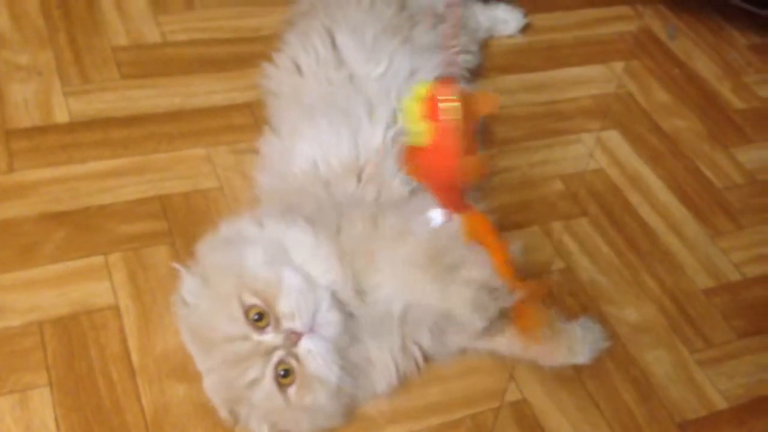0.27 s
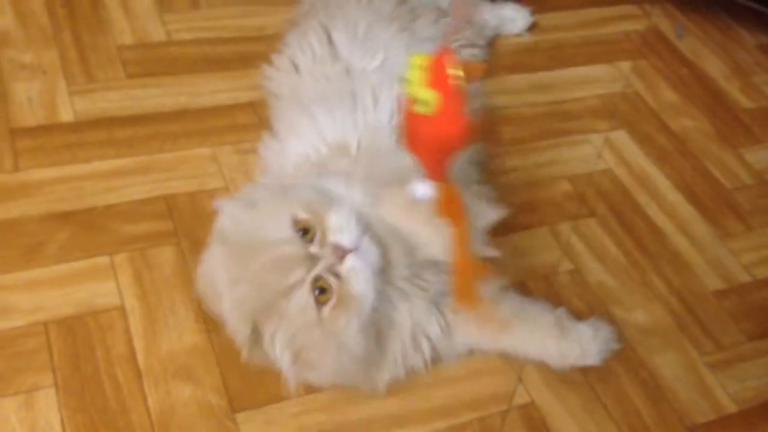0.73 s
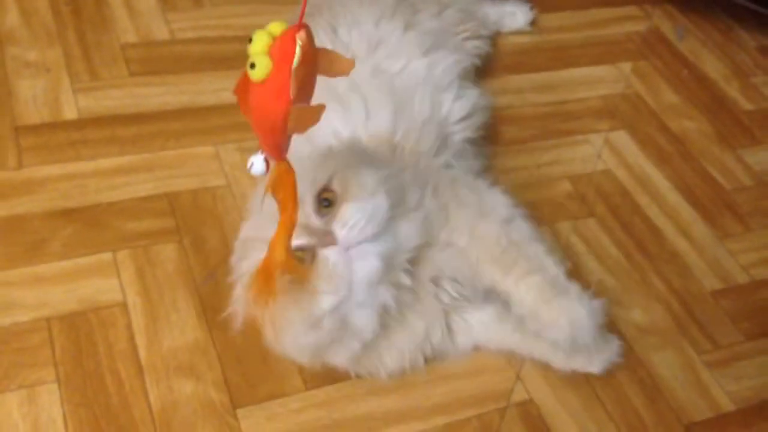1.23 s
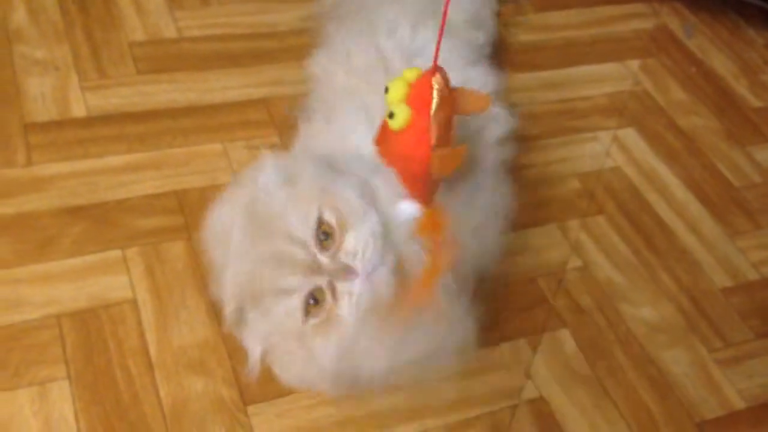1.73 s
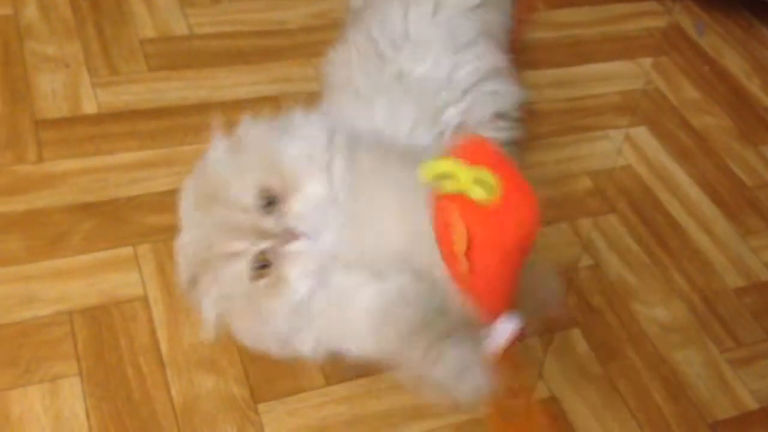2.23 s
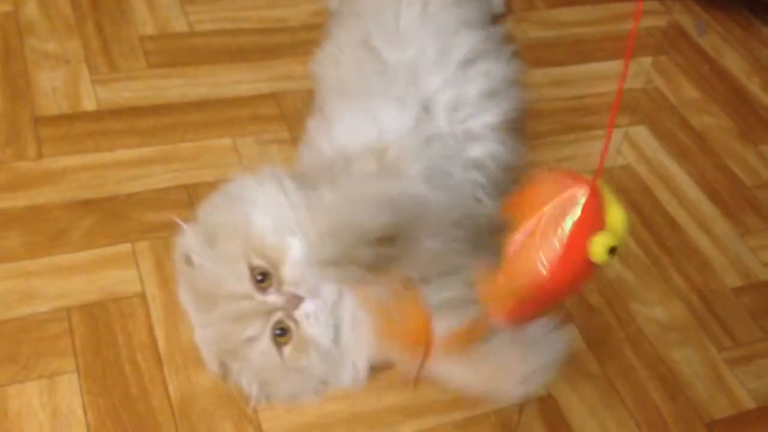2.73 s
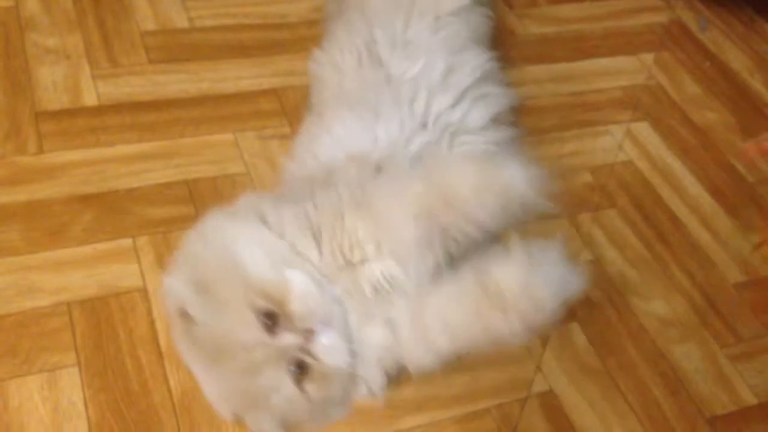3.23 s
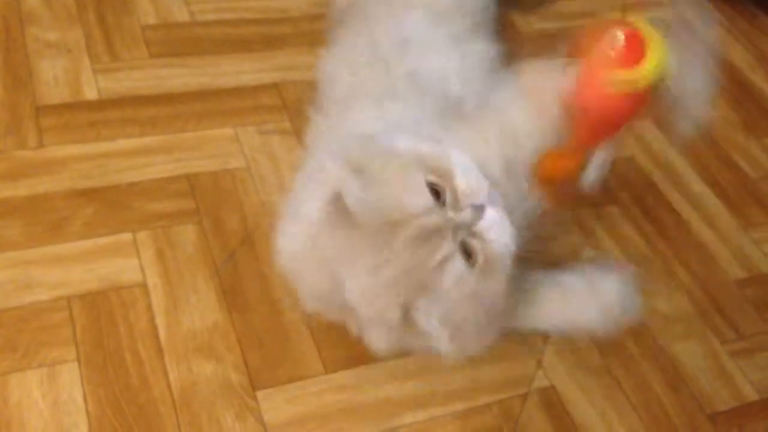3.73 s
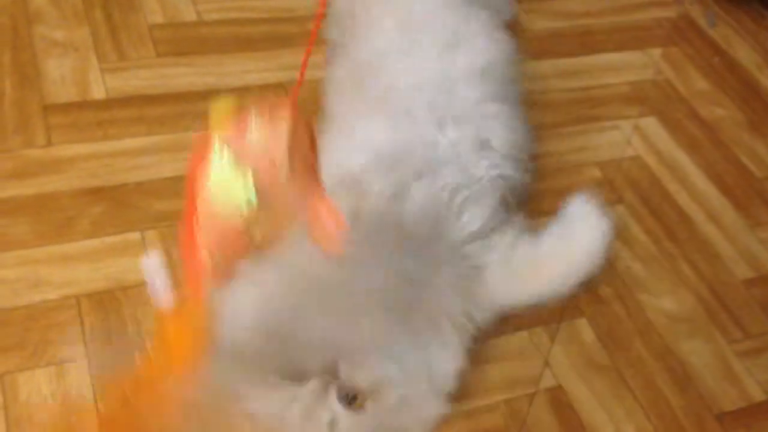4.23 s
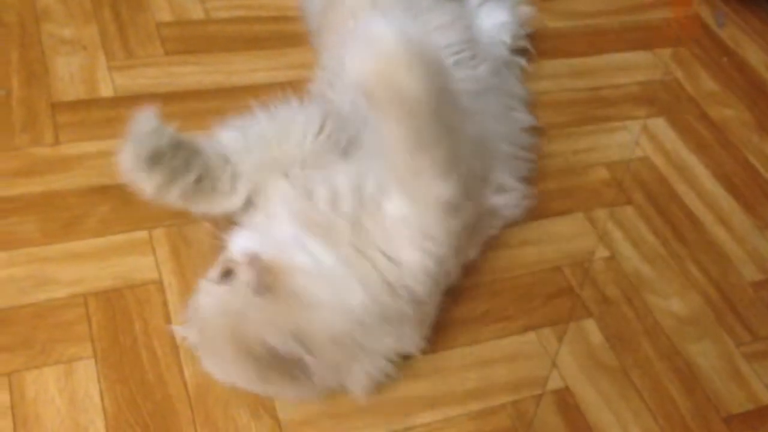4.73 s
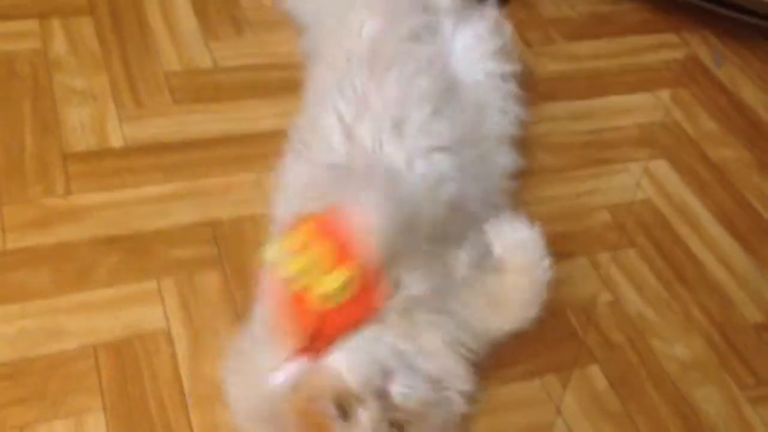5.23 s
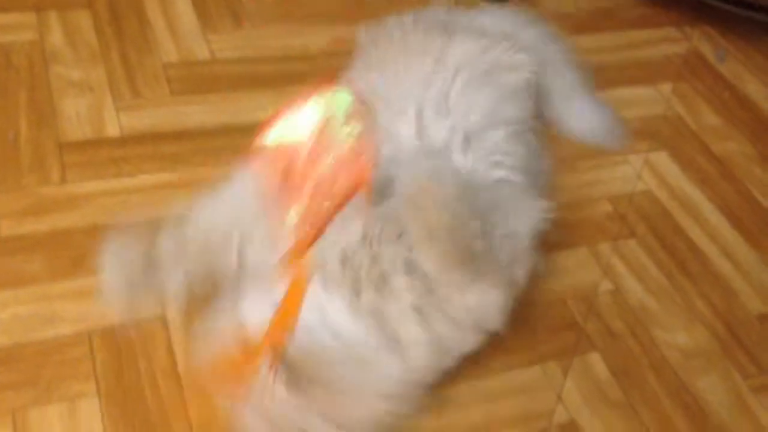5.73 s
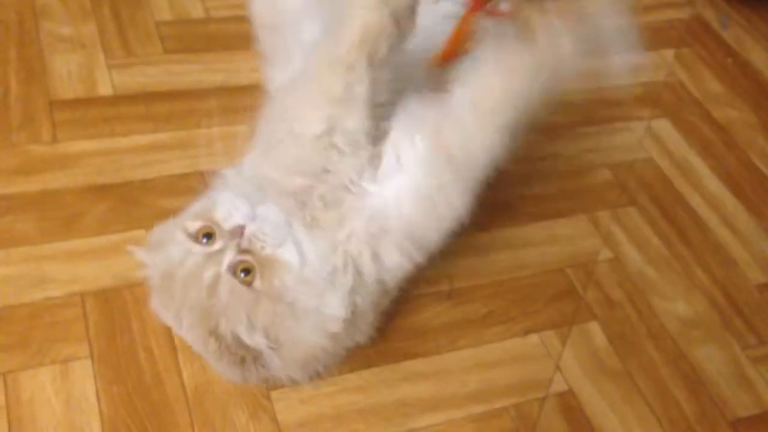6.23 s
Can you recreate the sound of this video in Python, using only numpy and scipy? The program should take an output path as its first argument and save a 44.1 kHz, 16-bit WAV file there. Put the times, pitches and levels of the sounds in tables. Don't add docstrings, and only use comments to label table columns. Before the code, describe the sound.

A tiny bell inside a dangling toy tinkles in short irregular bursts as a kitten bats it, with claw clicks and soft thumps on wood.

```python
import sys
import numpy as np
from scipy import signal
from scipy.fft import rfft, irfft
from scipy.io import wavfile

SR = 44100
rng = np.random.default_rng(int(sys.argv[2]) if len(sys.argv) > 2 else 0)


def log_audio(samples):
    frames = np.atleast_2d(samples).T
    limited = np.clip(frames, -1, 1)
    pcm = np.round(limited * 32767).astype(np.int16)
    wavfile.write(sys.argv[1], SR, pcm)


def gain_from_decibels(decibels):
    exponent = np.asarray(decibels, float) / 20
    return 10 ** exponent


N = 285327

# start_s, length_s, chatter_db, swish_rms_db
TOY_SHAKES = [(1.905, .07, -54, -62), (2.074, .02, -62, -56), (2.092, .2, -54, -63),
              (2.59, .037, -58, -60.5), (2.65, .032, -49, -60), (3.157, .055, -50, -58),
              (3.198, .08, -47, -54), (3.795, .083, -53, -58.5), (4.424, .13, -51, -60),
              (5.27, .042, -56, -66), (6.406, .055, -56, -63)]


def evened(x):
    return x / np.sqrt(np.mean(x ** 2) + 1e-20)


def add(mix, start_s, sound):
    part = mix[max(round(start_s * SR), 0):][:len(sound)]
    part += sound[:len(part)]


def coloured(x, points):
    f, db = np.transpose(points)
    hz = np.fft.rfftfreq(len(x), 1 / SR)
    response_db = np.interp(np.log(hz + 1), np.log(f + 1), db)
    return irfft(rfft(x) * gain_from_decibels(response_db), len(x))


def banded(x, hz, width_hz, order=2):
    low = max(hz - width_hz / 2, hz / 4)
    high = min(hz + width_hz / 2, SR / 2 - 100)
    return signal.sosfilt(signal.butter(order, [low, high], "bandpass", fs=SR, output="sos"), x)


def ringing(modes, t, phases, pitch=1, damping=1):
    return sum(gain_from_decibels(db - 60 * damping * t / t60) * np.sin(2 * np.pi * (hz * pitch * t + phase))
               for (hz, db, t60), phase in zip(modes, phases))


def floor():
    # freq_hz, level_db_per_hz
    hum_spectrum = [(15, -31), (30, -12), (52, 3.5), (62, -1.5), (100, -0.5), (185, -1.5), (240, -9),
                    (290, -7), (400, -14.5), (520, -11), (800, -17.5), (1200, -29.5), (2000, -54)]
    hiss_spectrum = [(410, -23), (700, -10.5), (917, -14.5), (1060, -9.5), (1770, -12.5), (2290, -11),
                     (15200, -14)]
    knots = np.arange(0, N + 500, 500)
    lumps = np.interp(np.arange(N), knots, rng.standard_normal(len(knots)))
    hum = evened(coloured(rng.standard_normal(N), hum_spectrum))
    hum += banded(hum, 312, 445) * (gain_from_decibels(3.9 * np.clip(lumps, -2, 1.8)) - 1)
    drone = evened(banded(rng.standard_normal(N), 519.3, 62))
    hiss = evened(coloured(rng.standard_normal(N), list(hiss_spectrum) + [(15450, -26)]))
    return gain_from_decibels(-66.5) * hum + gain_from_decibels(-78) * drone + gain_from_decibels(-68) * hiss


def room(x):
    # freq_hz, t60_s
    decay_times = [(200, 0.32), (2000, 0.12), (6000, 0.17), (14000, 0.11)]
    taps = np.zeros(SR // 2)
    at = np.arange(130, len(taps) - 20, 20)
    taps[at + rng.integers(0, 20, len(at))] = rng.choice([-1., 1.], len(at))
    hz, t, z = signal.stft(taps, SR, nperseg=128)
    f, t60 = np.transpose(decay_times)
    decay = gain_from_decibels(-60 * t / np.interp(hz, f, t60)[:, None])
    tail = signal.istft(z * decay, SR, nperseg=128)[1]
    return signal.fftconvolve(x, tail / np.linalg.norm(tail))[:N]


def thumps():
    # start_s, blow_db, pitch_factor, damping_factor
    blows = [
        (3.9328, -21.5, 1, 1.27),
        (3.978, -38, 1.04, 1.7),
        (4.08, -45.5, 1, 1.05),
        (4.269, -42.5, 0.9, 1.25),
        (4.31, -51, 0.406, 0.85),
        (6.24, -48.5, 0.48, 1.2),
        (.56, -54.5, 1.5, 1.3),
        (.47, -57, 1.61, 0.57),
    ]
    # freq_hz, level_db, t60_s
    board_modes = [(184, 5.5, 0.22), (214, -14, 0.07), (158, -17, 0.073), (272, -27, 0.068),
                   (430, -8, 0.047), (730, -46, .03)]
    out, t = np.zeros(N), np.arange(9000) / SR
    for start, db, pitch, damping in blows:
        ring = ringing(board_modes, t, np.zeros(len(board_modes)), pitch, damping)
        ring *= 1 - np.exp(-(t / 0.002) ** 2)
        ring *= .06 + .94 / (1 + (damping * t / .038) ** 8)
        ring = banded(ring, 440 * pitch, 600 * pitch, order=3)
        add(out, start, gain_from_decibels(db) * ring / abs(ring).max())
    return out


def rustles():
    strokes = list([(0, .068, -65.5, 3000, 5000), (0, .035, -70, 10000, 900), (.434, .23, -64.5, 520, 500),
                    (.46, .16, -73, 1500, 1000), (.61, .21, -71, 13100, 5000), (.866, .16, -66, 3870, 3520),
                    (.86, .19, -72, 9900, 700), (.856, .17, -75, 8850, 8000), (1.45, .047, -61, 3000, 4500),
                    (3.999, .03, -57, 2600, 2400), (1.735, .09, -70, 11500, 2500),
                    (4.805, .09, -72, 750, 120), (3.93, .12, -69, 9000, 11000),
                    (4.043, .06, -69, 3000, 4500), (4.212, .034, -59, 5500, 7500),
                    (4.105, .035, -61, 3500, 5500), (4.88, .11, -65.5, 7000, 7500),
                    (3.98, .15, -71, 1050, 400), (5.542, .46, -72.5, 6300, 7900),
                    (5.873, .05, -69, 2000, 500), (5.995, .18, -64, 11800, 6600),
                    (5.99, .37, -70.5, 3500, 4070), (6.274, .076, -66, 1000, 1800),
                    (2.073, .025, -47, 3000, 4500)])
    swish_hz, swish_width_hz = 6800, 6500
    grain_full_db, long_s = 3.5, .1
    strokes += [(start, length, db, swish_hz, swish_width_hz) for start, length, _, db in TOY_SHAKES]
    out = np.zeros(N)
    noise = rng.standard_normal(N)
    size = np.repeat(np.minimum(rng.exponential(1, N // 60 + 1), 3), 60)[:N]
    lumps = rng.standard_normal((len(strokes), 24))
    for (start, length, db, hz, width_hz), lump in zip(strokes, lumps):
        grain_db = grain_full_db * min(length / long_s, 1)
        part = slice(max(round(start * SR), 0), round((start + length) * SR))
        slips = banded(noise[part] * gain_from_decibels(grain_db * size[part]), hz, width_hz, order=1)
        resonances = np.c_[np.geomspace(300, 16000, num=len(lump)), 2.2 * lump]
        slips = evened(coloured(slips, resonances))
        u = np.linspace(0, 1, len(slips))
        swell = np.minimum(u / 0.067, 1) * np.minimum((1 - u) / 0.44, 1)
        add(out, start, gain_from_decibels(db) * slips * swell)
    return out


def scrapes():
    # start_s, length_s, rms_db
    drags = [
        (1.441, .021, -57),
        (2.074, 0.018, -56),
    ]
    # freq_hz, level_db, t60_s
    toy_modes = [(1040, -0.5, 0.014), (1510, -0.5, 0.012), (2190, 1, 0.012), (3750, -1, 0.0064)]
    out, t = np.zeros(N), np.arange(1500) / SR
    for start, length, db in drags:
        slips = rng.standard_normal(2000) * (rng.random(2000) < .04) * (np.arange(2000) < length * SR)
        rung = np.convolve(slips, ringing(toy_modes, t, np.zeros(len(toy_modes))))
        add(out, start, gain_from_decibels(db) * evened(banded(rung, 3100, 4500)))
    return out


def clicks():
    # start_s, peak_db, centre_hz, width_hz
    snaps = [(.483, -62, 3000, 3000), (.549, -41, 2500, 3000), (0.725, -42.5, 2500, 5000),
             (1.202, -46.5, 1400, 2200), (1.4816, -26, 10900, 3980), (1.4828, -32.5, 6000, 8100),
             (1.798, -44, 1670, 1690), (2.0755, -35.5, 6340, 5000), (3.146, -50, 5000, 6000),
             (3.172, -38, 5000, 7000), (.765, -58, 12700, 500), (4.004, -43, 2600, 3500),
             (4.019, -42, 2400, 3500), (4.031, -46, 3000, 5000), (4.047, -50, 3000, 5000),
             (4.067, -50, 2500, 3000), (4.075, -47, 3000, 5000), (4.091, -50, 1800, 2500),
             (4.916, -47.5, 750, 600), (6.012, -54, 1900, 700), (6.083, -62, 14300, 400)]
    out, t = np.zeros(N), np.arange(600) / SR
    for (start, db, hz, width_hz), noise in zip(snaps, rng.standard_normal((len(snaps), 600))):
        snap = banded((t == 0) + 0.13 * noise * np.exp(-t / 0.0012), hz, width_hz)
        add(out, start, gain_from_decibels(db) * snap / abs(snap).max())
    return out


def pellet():
    # start_s, low_mode_db, middle_mode_db, tick_db
    dangling = [(1.7987, -57, -58, -42), (1.8338, -53, -61, -48), (1.9096, -48, -39, -36),
                (1.9307, -40, -46, -43), (1.9417, -36.5, -33.5, -49), (1.9551, -44, -56, -55),
                (2.0235, -49, -54, -46), (2.0359, -50, -55, -40), (2.0748, -60, -57, -28),
                (2.0816, -67, -58, -27), (2.0955, -23, -25.5, -18), (2.1030, -24, -33, -31),
                (2.1124, -27, -31, -25), (2.1326, -45, -41, -36), (2.1487, -33, -39, -30.5),
                (2.1661, -39, -46, -35), (2.1805, -30, -32, -28.5), (2.1988, -43, -50, -48),
                (2.2074, -39, -47, -33), (2.2255, -40, -53, -32.5), (2.2614, -32.5, -33, -38),
                (2.2711, -39, -64, -38), (2.5923, -47, -54, -34), (2.5971, -50, -42, -41),
                (2.6037, -47, -41, -46), (2.6512, -42, -49, -31), (2.6583, -42, -40, -43),
                (2.662, -38, -48, -40), (2.7013, -28.5, -21, -28), (2.711, -48, -44, -30)]
    # start_s, low_mode_db, middle_mode_db, tick_db
    swatted = [(3.1745, -37.5, -48, -36), (3.1825, -42, -39, -33), (3.2009, -43, -40, -46),
               (3.2197, -27, -41, -31), (3.2309, -39, -55, -45), (3.2341, -31, -41, -33),
               (3.2515, -42, -35, -42), (3.2599, -33.5, -54, -42), (3.4141, -40, -51, -35.5),
               (3.4229, -45, -51, -39), (3.8007, -38, -49, -40), (3.8063, -59, -62, -30.5),
               (3.8312, -29.5, -35, -37), (3.8368, -27, -26, -38), (3.8406, -24.5, -43, -24),
               (4.4257, -38, -26.5, -27), (4.437, -34, -44, -32), (4.4589, -20, -44, -25.5),
               (4.469, -59, -48, -33), (4.4767, -34, -37, -35), (4.4802, -52, -35, -36),
               (4.506, -46, -41, -50), (4.6851, -43, -47, -40), (4.6913, -41, -62, -38),
               (4.7201, -43, -61, -51), (4.7288, -44, -58.5, -52), (5.2722, -31, -49, -32),
               (5.2833, -39, -68, -50), (5.2996, -45, -72, -41), (6.4116, -37, -46, -40)]
    # start_s, level_db
    faint_rolls = [(1.853, -58), (1.881, -60), (2.043, -50), (2.247, -54), (2.462, -54), (2.56, -57),
                   (3.265, -42), (3.2924, -52), (3.405, -60), (3.803, -36), (3.848, -44), (3.9324, -54),
                   (4.472, -37), (4.5277, -47), (4.54, -51), (4.571, -53), (4.5591, -50), (4.638, -58),
                   (5.004, -63), (5.016, -54), (5.2507, -49), (5.64, -60), (6.187, -52), (6.206, -52.5),
                   (6.384, -60), (6.4328, -50)]
    hard = np.array(list(dangling) + list(swatted), float)
    c = rng.random((len(hard), 3)) - .5
    rebounds = hard + np.c_[.0065 * (1 + .4 * c[:, 0]), -20 + 8 * c[:, 1:], -18 + 8 * c[:, 0]]
    rows = [hard, rebounds]
    gap_s, spread_db, middle_db, tick_db = .006, 13, -2, 4
    for (start, length, db, _), c in zip(TOY_SHAKES, rng.random((len(TOY_SHAKES), 48, 4))):
        after = gap_s * np.cumsum(.5 + c[:, 0])
        level = db - 10 * (after / length) ** 4
        levels = level[:, None] + [0, middle_db, tick_db] + spread_db * (c[:, 1:] - .5)
        chatter = np.c_[start + after, levels]
        rows.append(chatter[after < length])
    start, low, middle, tick = np.vstack(rows).T
    c = rng.random((600, 2))[:len(start)] - .5
    high = np.maximum(low, middle) - 16 + 14 * c[:, 0]
    cavity = tick - 17 + 16 * c[:, 1]
    rolls = [(s, db, db - 7, db - 14, db - 8, db - 6) for s, db in faint_rolls]
    return rolls + list(np.c_[start, low, middle, high, cavity, tick])


def bell():
    # freq_hz, level_db, t60_s
    shell_modes = [
        [(12130, 0, .015), (12230, -13, .04), (11750, -13, .007)],
        [(13380, 0, .014), (13460, -17, .045), (12750, -11, .007)],
        [(14780, -2, .012), (14650, -12, .04)],
        [(6550, -3, .009)],
    ]
    # freq_hz, level_db
    tick_spectrum = [(600, -31), (1800, -3.5), (4000, 5.5), (6500, 6.5), (8500, 9.5), (11000, -9),
                     (16000, -4)]
    rings, ticks, t = np.zeros(N), np.zeros(N), np.arange(2500) / SR
    strikes = pellet()
    chance = rng.random((600, 12))
    rise = 1 - np.exp(-t / .0001)
    tick = coloured(np.roll(t == 0, 40) * 1., tick_spectrum)[:200]
    tick = tick / abs(tick).max()
    for (start, *modes_db, tick_db), c in zip(strikes, chance):
        detune = 1 + .009 * (c[11] - .65)
        damping = 0.65 + .5 * c[10]
        ring = sum(gain_from_decibels(db) * ringing(modes, t, 0.18 * c[3 * k:], detune, damping)
                   for k, (modes, db) in enumerate(zip(shell_modes, modes_db)))
        add(rings, start, gain_from_decibels(-0.7) * rise * ring)
        add(ticks, start - 40 / SR, gain_from_decibels(tick_db - 2.5) * tick)
        add(ticks, start + .0008 + .0006 * c[9], gain_from_decibels(tick_db - 0.5 - 12 * c[8]) * tick)
    floor_bounce = .25 * np.roll(rings, round(.0016 * SR))
    return rings + floor_bounce + ticks


def scene():
    near = bell() + clicks() + rustles() + scrapes()
    boards = thumps()
    reverberant = gain_from_decibels(-10) * room(near + .25 * boards)
    return (near + boards + reverberant + floor())[None]


def low_pass(x):
    return signal.sosfilt(signal.butter(12, 16500, fs=SR, output="sos"), x)


def record(dry):
    top = coloured(dry[0], [(20, -1.5), (15300, 1), (15450, -30), (16400, -25), (16600, -90)])
    return low_pass(top[None])


dry = scene()
out = record(dry)
log_audio(out)
```